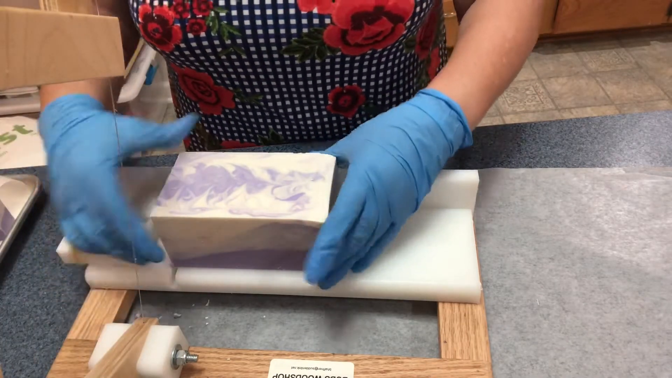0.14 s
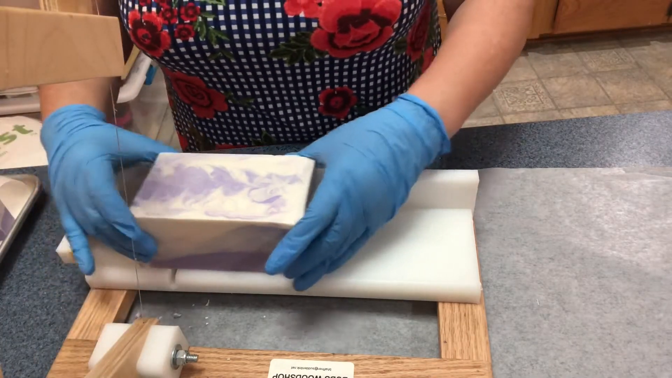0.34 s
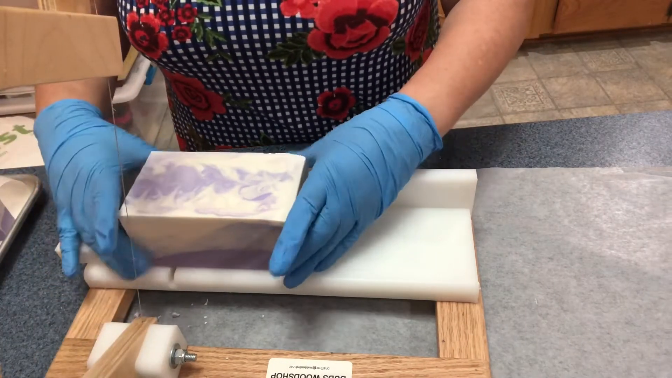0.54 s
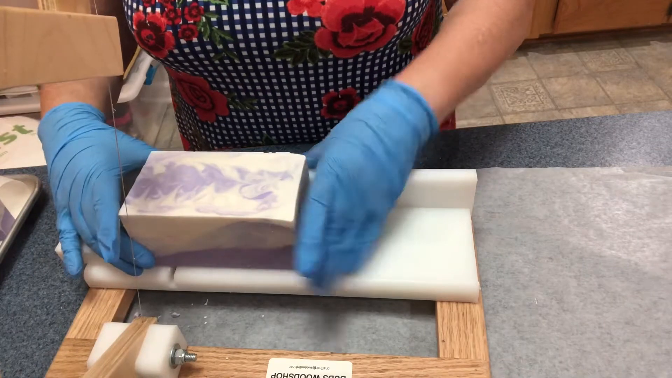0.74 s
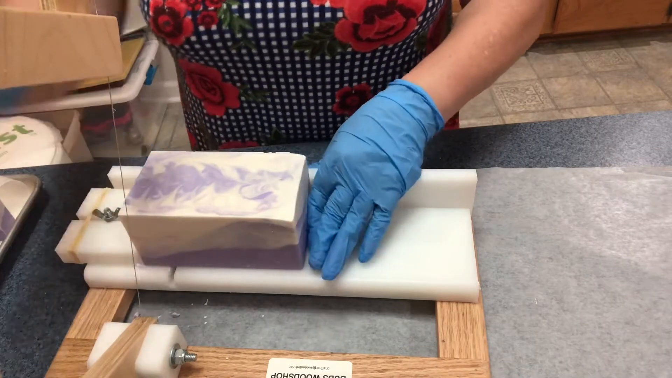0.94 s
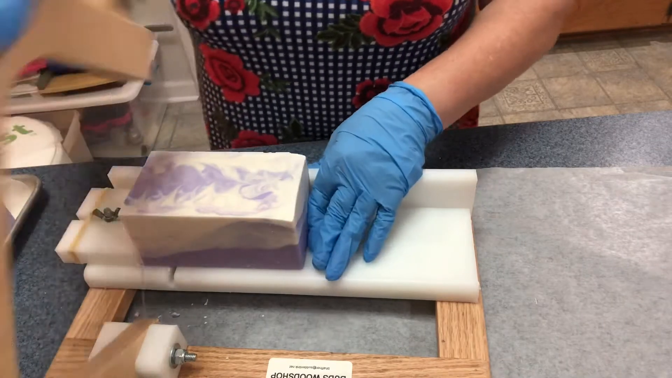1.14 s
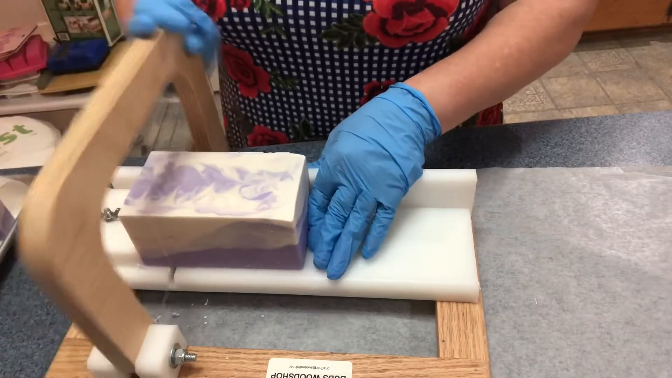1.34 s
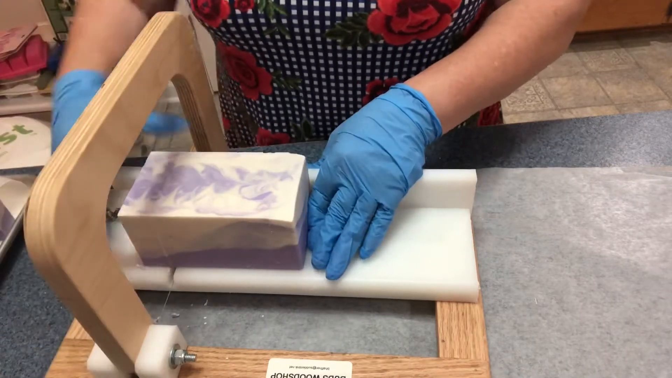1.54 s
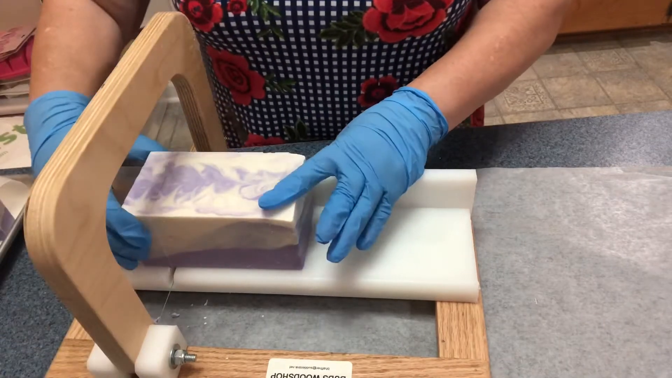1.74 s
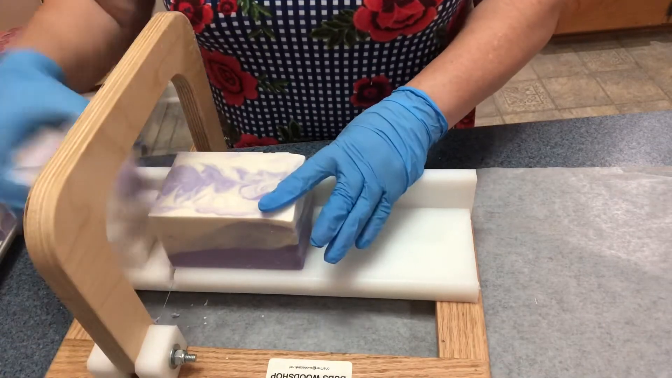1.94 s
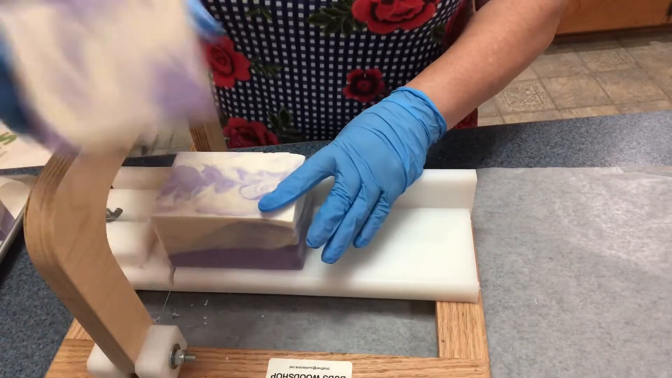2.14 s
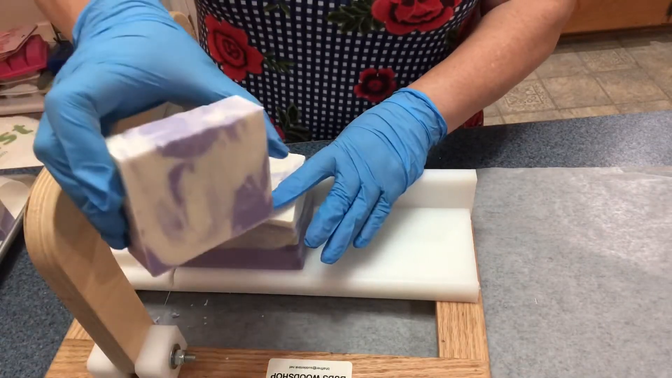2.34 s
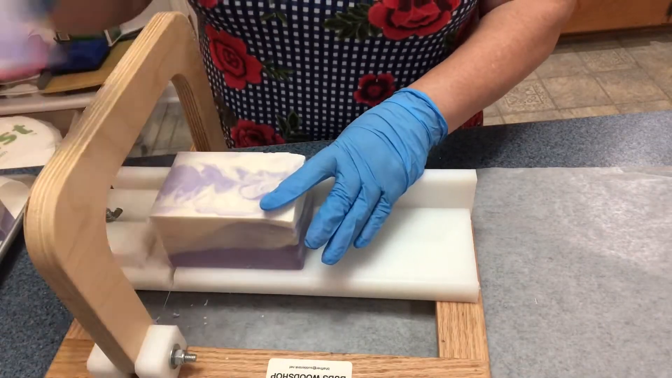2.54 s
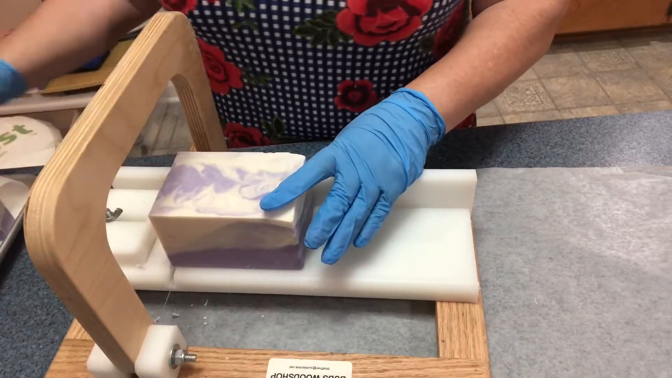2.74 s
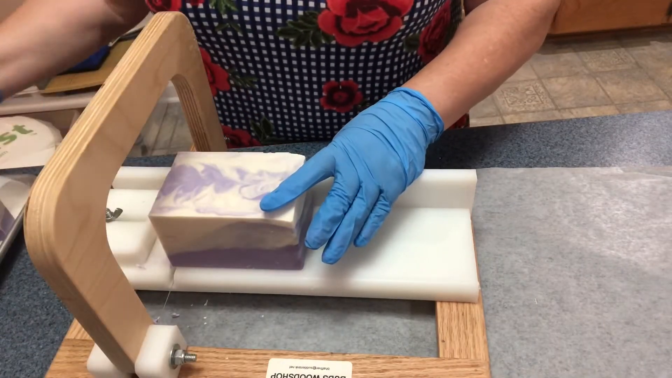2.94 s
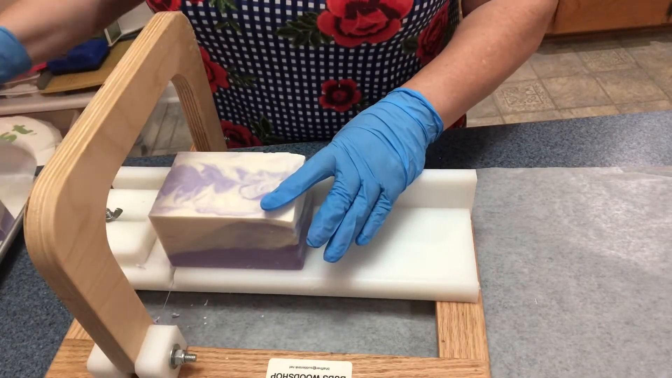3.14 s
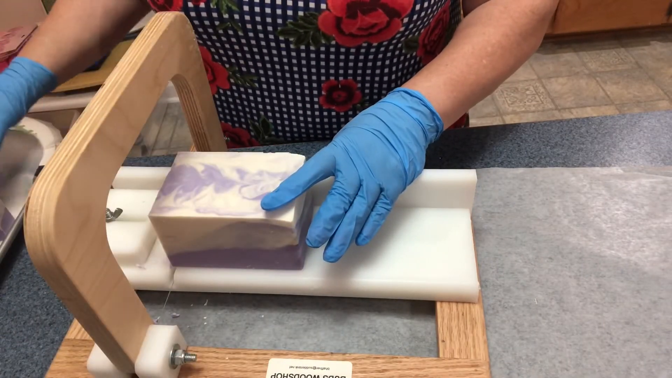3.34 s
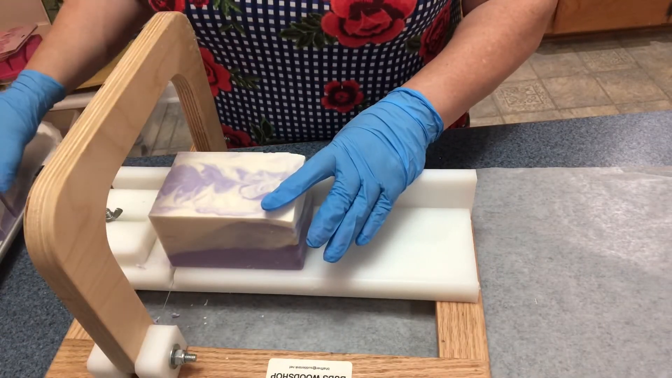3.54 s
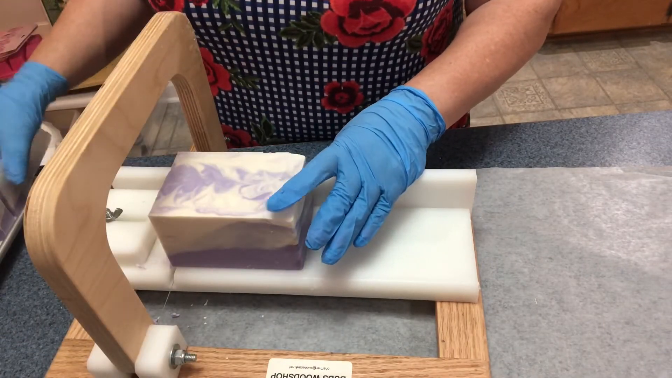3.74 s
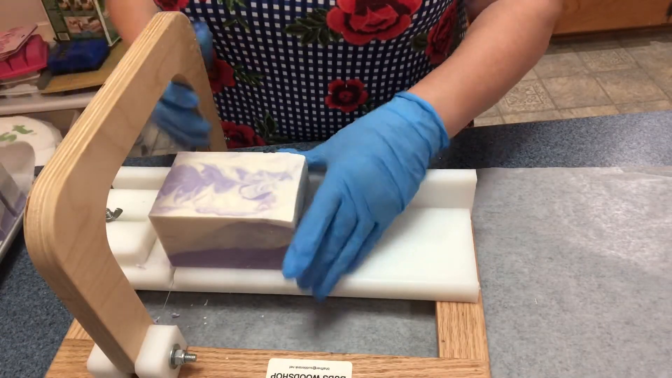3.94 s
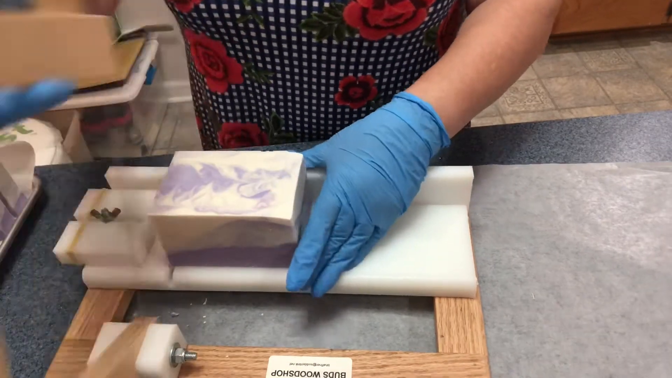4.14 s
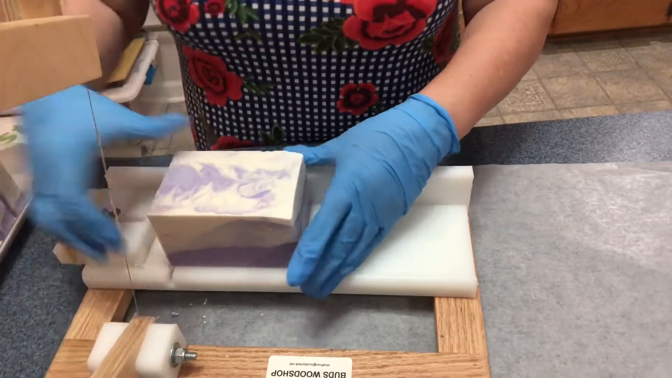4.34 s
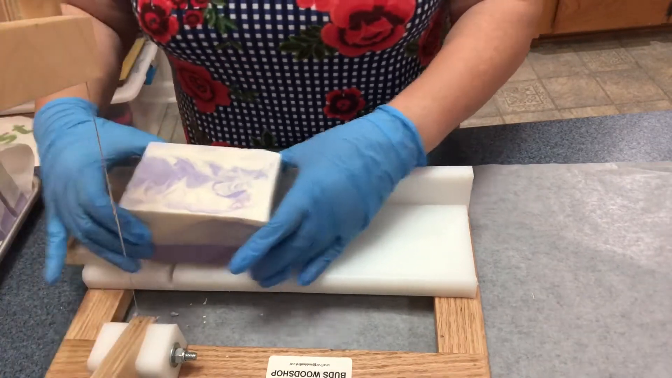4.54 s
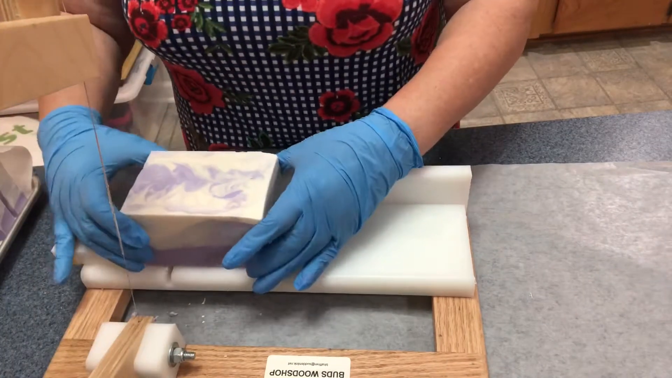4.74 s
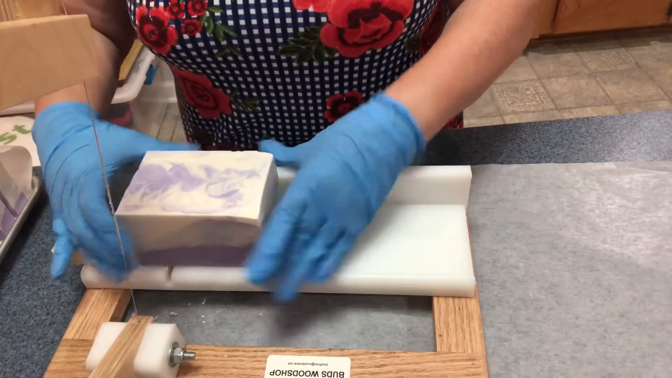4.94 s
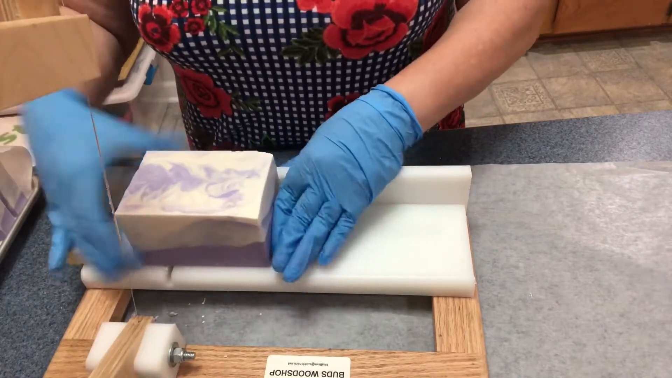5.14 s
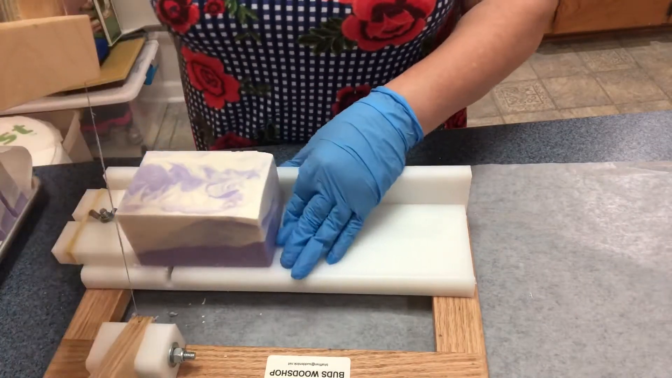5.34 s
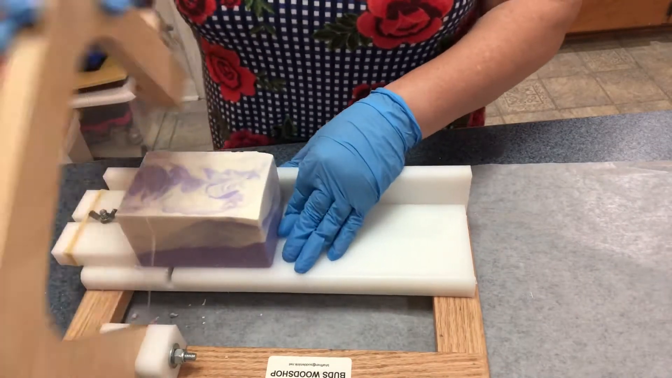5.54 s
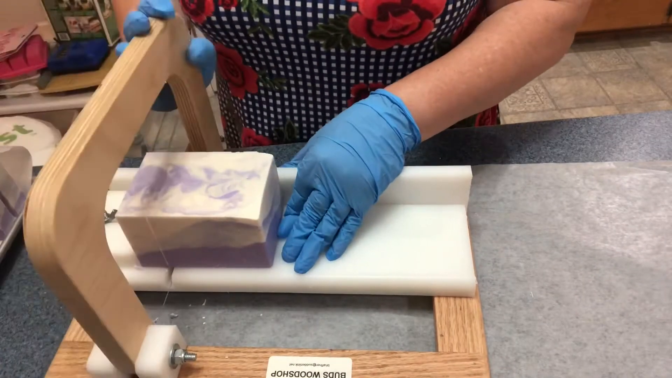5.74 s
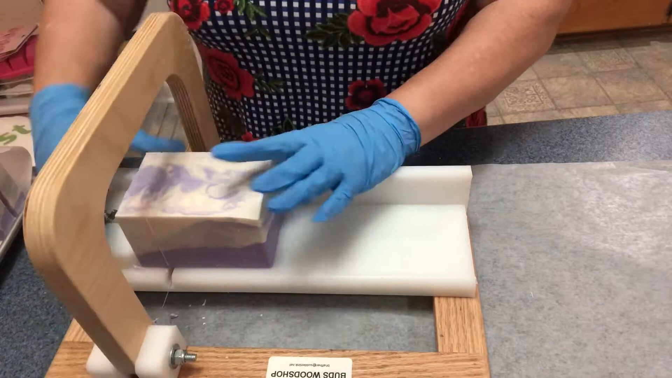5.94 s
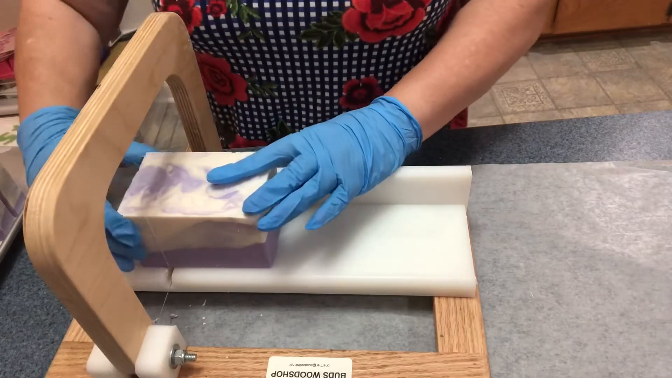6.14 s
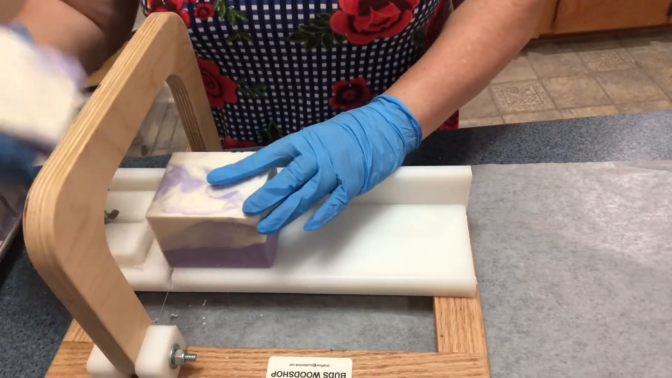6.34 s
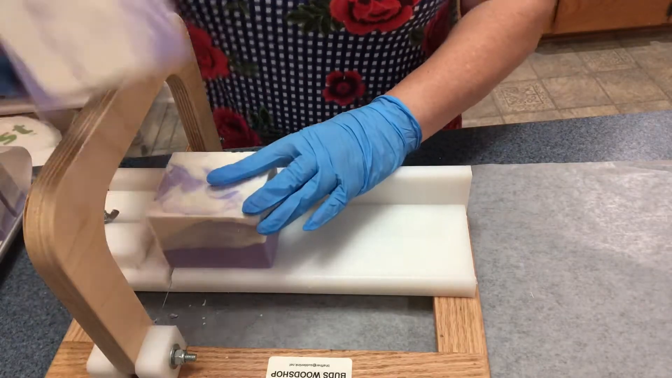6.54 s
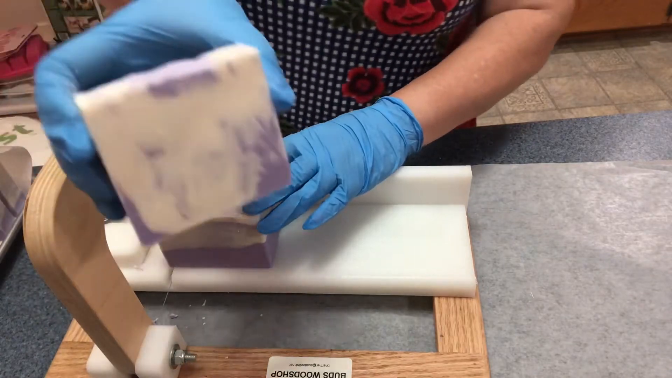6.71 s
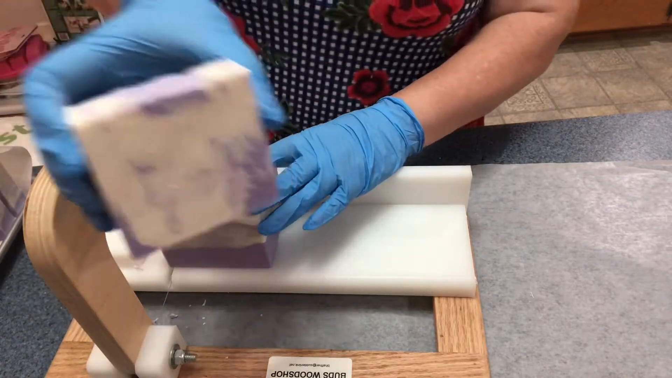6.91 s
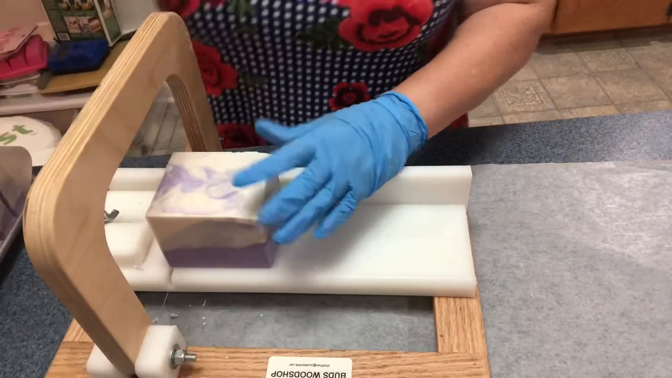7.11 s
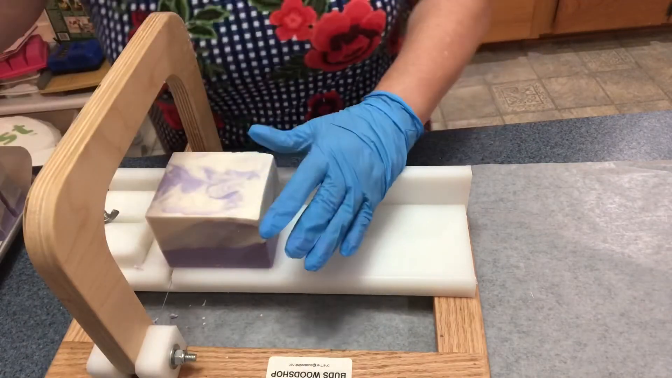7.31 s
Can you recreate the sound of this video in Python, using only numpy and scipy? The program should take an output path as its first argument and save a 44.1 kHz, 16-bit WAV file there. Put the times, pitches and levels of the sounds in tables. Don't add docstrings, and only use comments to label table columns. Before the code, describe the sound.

Close up in a small, slightly live kitchen, an appliance hums quietly with a thin whine. Rubber gloves rub, tick and tap a soap loaf on a plastic tray. A wire cracks hard onto the board, ringing wood and metal fittings. Crisp paper rustles follow, then more glove taps, squeaks and bumps before a second equally sharp crack and a few faint crinkles.

```python
import sys
import numpy as np
from scipy import signal
from scipy.fft import rfft, irfft
from scipy.io import wavfile
from scipy.ndimage import uniform_filter1d

SR = 44100
rng = np.random.default_rng(int(sys.argv[2]) if len(sys.argv) > 2 else 0)


def level_to_linear(level):
    exponent = np.asarray(level, float) / 20
    return 10 ** exponent


def waveform_to_disk(signal):
    frames = np.transpose(np.atleast_2d(signal))
    scaled = np.clip(frames, -1, 1) * 32767
    samples = np.round(scaled).astype(np.int16)
    wavfile.write(sys.argv[1], SR, samples)


N = 325017
T = np.arange(N) / SR


def colour(x, points, phase=0):
    hz = np.maximum(np.fft.rfftfreq(len(x), 1 / SR), 1)
    f, db = np.transpose(points)
    gain = level_to_linear(np.interp(np.log(hz), np.log(f), db))
    return irfft(rfft(x) * gain * np.exp(1j * phase), len(x))


def band(x, lo_hz, hi_hz):
    sos = signal.butter(2, [lo_hz, min(hi_hz, 0.48 * SR)], "bandpass", fs=SR, output="sos")
    return signal.sosfilt(sos, x)


def add(out, s, sound, db):
    i = int(s * SR)
    sound = sound[:N - i]
    out[i:i + len(sound)] += sound * level_to_linear(db) / np.max(np.abs(sound))


def fade(t, t60):
    return np.exp(-np.log(1000) * t / t60)


def ring(modes, phases, size):
    t = T[:size]
    out = 0
    for (hz, db, t60), phase in zip(modes, phases):
        out = out + level_to_linear(db) * np.sin(2 * np.pi * (hz * t + phase)) * fade(t, t60)
    return out


def walk(rate):
    k = int(SR / rate)
    held = np.repeat(rng.standard_normal(N // k + 1), k)
    return 1.9 * uniform_filter1d(uniform_filter1d(held, k), k)[:N]


def tick(hz, ms, noise, skirt=0.9):
    rise = 0.12
    t = T[:len(noise)] * 1000 / ms
    burst = noise * (1 - np.exp(-t / rise)) * np.exp(-t)
    burst[int(rise * ms * SR / 1000) + 2] += 1.8
    return band(burst, hz / 1.1, hz * 1.1) + band(burst, hz / 1.9, hz * 1.7) + skirt * band(burst, 1200, 13000)


def kitchen():
    # (frequency [Hz], level [dB per Hz])
    hush_shape = [(30, -37), (55, -37.5), (108, -10), (200, -8.5), (400, -5), (560, -9.5), (780, -8.5),
                  (1700, -12), (2200, -16), (2700, -17.5), (4000, -23.5), (8000, -27), (16000, -31)]
    # (frequency [Hz], level [dB])
    drone = [(118.4, -85.5), (382, -83), (421, -81), (479, -85.5), (742.9, -82.5), (807.5, -85),
             (940, -84.5), (1184, -87), (1450, -89), (1879, -73), (2148, -85)]
    # (time [s], frequency [Hz], level [dB])
    whine_path = [
        (0, 1880, -82),
        (1.7, 1884, -82),
        (1.95, 1879, -73.5),
        (3.5, 1878, -75),
        (5.0, 1875, -75),
        (6.0, 1877, -76),
        (6.6, 1876, -74.5),
        (7.37, 1866, -73),
    ]
    hush = colour(rng.standard_normal(N), hush_shape)
    out = hush / hush.std() * level_to_linear(-65 + 0.4 * walk(2.95))
    for hz, db in drone:
        if abs(hz - whine_path[0][1]) > 40:
            line = band(rng.standard_normal(N), hz - 4, hz + 4)
            out += line / line.std() * level_to_linear(db + 1.3 * walk(0.8))
    s, hz, db = np.transpose(whine_path)
    whine = np.sin(2 * np.pi * np.cumsum(np.interp(T, s, hz)) / SR)
    return out + np.sqrt(2) * whine * level_to_linear(np.interp(T, s, db) + 1.2 * walk(3.0))


def room(x):
    # (centre [Hz], t60 [s], level [dB])
    tail_bands = [(151.2, 0.27, 1), (533, 0.22, -2), (1484, 0.21, 0), (3919, .21, -5.5), (7000, 0.22, -6),
                  (12700, 0.17, -6)]
    t, tail, onset_s = T[:SR // 2], 0, 0.0043
    middles = [np.sqrt(a[0] * b[0]) for a, b in zip(tail_bands, tail_bands[1:])]
    edges = [60] + middles + [18000]
    for (hz, t60, db), lo, hi in zip(tail_bands, edges, edges[1:]):
        decay = fade(t, t60)
        noise = rng.standard_normal(len(t)) * decay * (1 - np.exp(-(t / onset_s) ** 2))
        tail = tail + level_to_linear(db) * band(noise, lo / 0.97, hi * 1.09) / np.sqrt(np.sum(decay ** 2))
    return signal.fftconvolve(x, tail)[:N]


def strokes(rows):
    release_s = 0.011
    out = np.zeros((2, N))
    for start, end, db, swell_db in rows:
        i, j = int(start * SR), int(end * SR)
        treble_db = -np.log2((end - start) / 0.029)
        swell = swell_db * np.linspace(-0.5, 0.5, j - i)
        out[:, i:j] += level_to_linear(db + swell + np.array([[0], [treble_db]]))
    keep = np.exp(-1 / (release_s * SR))
    return signal.lfilter([1 - keep], [1, -keep], uniform_filter1d(out, size=300, axis=1))


def crackle(per_s, size_db, ms):
    pops = (rng.random(N) < per_s / SR) * level_to_linear(size_db * rng.exponential(size=N))
    puffs = signal.lfilter([1], [1, -np.exp(-1000 / (ms * SR))], pops) * rng.standard_normal(N)
    puffs = band(puffs, 3600, 11000)
    return puffs / puffs.std()


def rubbing():
    # (start [s], end [s], level [dB], swell [dB])
    rubs = [(0.071, 0.096, -67, -3), (0.164, 0.185, -71, -1), (0.22, 0.236, -70, 22),
            (0.427, 0.478, -71, -22), (0.653, 0.7, -68, -6), (0.725, 0.79, -64.5, -1),
            (1.001, 1.022, -62, -4), (1.031, 1.304, -70, -3), (1.55, 1.58, -65, -32.5),
            (1.584, 1.677, -72.5, -2), (1.841, 1.88, -71, -26), (3.988, 4.139, -63, -8),
            (4.171, 4.203, -59, -14), (4.363, 4.401, -64, -7), (4.518, 4.55, -66, -20),
            (4.598, 4.66, -70, -21), (4.698, 4.716, -67, -23), (4.872, 4.892, -56, 6.5),
            (4.893, 4.91, -66, -11), (4.948, 4.978, -63, -14), (5.091, 5.102, -51.5, 11),
            (5.104, 5.13, -71, -14), (5.269, 5.322, -63, 0), (5.36, 5.599, -71, -1),
            (5.869, 5.944, -74.5, -8.5), (6.119, 6.154, -70.5, 6), (6.384, 6.461, -73, -3),
            (7.003, 7.078, -82, -7)]
    # (start [s], end [s], level [dB], swell [dB])
    rustles = [(2.6, 2.7, -81.5, 3), (2.705, 2.74, -66.5, 2), (2.744, 2.842, -75, 10),
               (2.861, 2.887, -73, -23.5), (2.93, 2.955, -60.5, -2), (2.956, 2.993, -51, 5),
               (2.997, 3.026, -50, -13), (3.032, 3.046, -52, 0), (3.046, 3.056, -43, -8),
               (3.058, 3.08, -56.5, -16), (3.08, 3.145, -63.5, -13), (3.147, 3.225, -68.5, -4),
               (3.27, 3.318, -70, -4), (3.322, 3.385, -69, 4), (3.39, 3.445, -60.5, -15),
               (3.448, 3.496, -67.5, -6), (3.502, 3.514, -49, -10), (3.516, 3.534, -53.5, 11),
               (3.536, 3.558, -59.5, -15), (3.56, 3.63, -76, -8), (3.63, 3.716, -68.5, 4),
               (3.72, 3.77, -64.5, -18), (3.775, 3.865, -69.5, 8), (3.899, 3.948, -67, -13),
               (3.95, 3.993, -71, 13)]
    slip_times = rng.random(N) < 5000 / SR
    grains = slip_times * level_to_linear(rng.exponential(size=N)) * rng.standard_normal(N)
    slips = grains / grains.std() + 1.3 * rng.standard_normal(N)
    bands = [band(slips, 440, 1000), band(slips, 2000, 9500), band(slips, 7500, 14500)]
    under, low, high = [v / v.std() for v in bands]
    crisp = band(slips, 3200, 13300)
    pops = crackle(140, 2.8, 0.8)
    rubber = low + level_to_linear(-14) * under
    paper = crisp / crisp.std() + level_to_linear(-5) * low + level_to_linear(-9) * under
    press, treble = strokes(rubs)
    out = press * rubber + treble * (level_to_linear(-5.5) * high + level_to_linear(-17) * pops)
    press, treble = strokes(rustles)
    out += press * paper + treble * (level_to_linear(-20) * high + level_to_linear(-12) * pops)
    return out * level_to_linear(1.72 * walk(60))


def squeaks():
    # (start [s], length [s], frequency [Hz], peak [dB])
    slides = [(.462, 0.017, 2580, -56), (.678, .016, 2660, -55), (1.561, 0.005, 5300, -48),
              (4.012, 0.019, 1950, -55), (4.03, 0.023, 5340, -60), (4.045, .01, 3800, -66),
              (4.094, 0.035, 5900, -59), (4.105, 0.023, 1740, -53), (4.108, 0.011, 780, -51.5),
              (4.959, 0.012, 2740, -59), (4.586, .01, 1000, -53), (4.196, 0.011, 5330, -56),
              (5.855, .01, 10340, -60), (5.888, 0.02, 13500, -60.5), (6.13, 0.026, 5300, -66)]
    out, width = np.zeros(N), 0.098
    for s, length, hz, db in slides:
        shape = np.sin(np.pi * np.clip(T[:4096] / length, 0, 1))
        hiss = band(rng.standard_normal(4096), hz * (1 - width), hz * (1 + width))
        add(out, s, hiss * shape, db)
    return out


def crunches():
    # (start [s], length [ms], peak [dB], centre [Hz])
    runs = [(.2315, 8.8, -54, 1950), (.2315, 7, -56, 5900), (0.3467, 2.5, -31, 8600),
            (.349, 4.4, -43, 1500), (.428, 9.2, -46.5, 8000), (0.431, 6, -54, 3200), (.44, 15, -46, 9500),
            (.467, 7, -50, 6000), (0.5623, 5.1, -48, 3300), (2.9555, 3, -38, 11000), (2.963, 4, -33, 7000),
            (3.0458, 9.6, -25.5, 7200), (3.049, 7.3, -43, 2200), (3.05, 9, -45, 700),
            (3.0605, 7, -33, 9000), (3.063, 6, -41, 2300), (3.406, 3, -41, 6000), (3.5058, 4, -29, 9000),
            (3.536, 5, -29.5, 5950), (3.548, 3.5, -38, 8000), (3.899, 7, -46, 6000), (3.911, 7, -50, 6500),
            (3.932, 9, -40, 7460), (4.172, 3.3, -49, 8000), (4.1765, 3, -38, 9700), (4.192, 9, -46, 9500),
            (4.5157, 4, -38, 6000), (4.517, 4.9, -48, 1800), (5.1006, 3.1, -32.5, 1430),
            (5.092, 11, -38.5, 9500), (5.095, 6, -42, 2600), (5.103, 5, -40, 9000), (1.5575, 6, -49, 6500),
            (1.559, 5, -54, 12000), (1.556, 10, -47, 2800), (1.5655, 3, -51, 7700), (2.9735, 3, -38, 8500),
            (3.093, 5, -39, 9500), (3.4565, 3.5, -35.5, 5000), (3.4572, 3, -31, 11500),
            (4.603, 5.4, -42, 7000), (4.699, 4.7, -45, 7000), (5.2983, 4, -39, 8500)]
    out, t, width = np.zeros(N), T[:1024], 1.54
    for s, ms, db, hz in runs:
        when, size, noise = rng.random((3, 1024))
        sizes = (when < 4000 / SR) * level_to_linear(-2.5 * np.log(size + 1e-9))
        slips = (0.27 + sizes) * (noise - 0.5)
        shape = np.sin(np.pi * np.clip(t * 1000 / ms, 0, 1) ** 0.59)
        add(out, s, band(slips * shape, hz / width, hz * width), db)
    return out


def creases_and_folds():
    # (time [s], peak [dB], centre [Hz])
    creases = [(0.0813, -50, 11740), (0.2232, -53, 11600), (0.3468, -31.5, 5400), (0.4349, -39.5, 8800),
               (.4493, -54, 8950), (.4538, -51, 7660), (0.6617, -49.5, 8400), (.6815, -49, 8000),
               (0.7113, -52, 5400), (.7446, -53, 5700), (0.7687, -42, 9560), (1.0142, -42, 8900),
               (1.0407, -42, 5270), (1.0575, -55, 11000), (1.1658, -49, 13000), (1.1801, -43, 12000),
               (1.188, -51.5, 10000), (1.2483, -46.5, 9470), (1.275, -43.5, 6950), (1.2815, -53, 9100),
               (1.5254, -52, 7100), (1.5627, -33, 5100), (1.6065, -50, 2820), (1.6127, -58, 3790),
               (1.6185, -56, 7750), (1.8576, -47, 7000), (3.99, -47, 2580), (4.1758, -27.5, 9800),
               (4.1801, -46, 3620), (4.185, -53, 6100), (4.1951, -46, 4600), (4.1998, -36, 9030),
               (4.4816, -47.5, 5340), (4.5792, -46.5, 5340), (4.5892, -43, 5430), (4.6081, -46, 8440),
               (4.8884, -43, 9390), (4.9338, -48, 6970), (4.9514, -52, 5340), (4.9672, -47, 2670),
               (4.9968, -54, 4500), (5.1047, -41, 3100), (5.2776, -51, 8180), (5.2847, -46, 5200),
               (5.3134, -51, 5580), (5.505, -42.5, 8950), (5.5386, -51, 10250), (5.5435, -40.5, 9470),
               (5.5561, -58, 3530), (5.7749, -31, 12600), (5.858, -57.5, 10340), (5.876, -44.5, 6000),
               (5.9432, -58, 8070), (6.3926, -53, 8980), (6.3969, -40.5, 9400), (6.4106, -57.5, 12400),
               (6.4375, -56, 7430), (6.4464, -38, 9160), (6.4468, -45, 3690), (7.0241, -56, 6010)]
    # (time [s], peak [dB], centre [Hz])
    folds = [(2.708, -51, 3620), (2.724, -44.5, 3530), (2.7612, -39.5, 9170), (2.794, -42.5, 10200),
             (2.8125, -43, 3700), (2.8202, -40, 3500), (2.8748, -48, 8360), (2.9529, -40, 3380),
             (2.9589, -34, 3650), (2.9632, -29, 6000), (2.9725, -34, 7500), (2.9746, -35, 3620),
             (2.9805, -39, 6000), (2.989, -36, 9000), (3.0092, -31, 6200), (3.0154, -30, 8180),
             (3.0205, -37, 6630), (3.0335, -28, 10500), (3.0385, -40, 6720), (3.0488, -22.5, 7500),
             (3.0615, -33, 8000), (3.0636, -26, 12000), (3.0945, -44, 10300), (3.1033, -47, 8950),
             (3.1529, -41, 8180), (3.379, -52, 9200), (3.391, -38, 5500), (3.3964, -32, 7000),
             (3.4065, -30, 12700), (3.4436, -49, 8600), (3.4564, -30.5, 10400), (3.4868, -49, 5680),
             (3.497, -44, 6290), (3.5021, -26.5, 8500), (3.5059, -26, 8440), (3.5175, -34, 11000),
             (3.5262, -37, 10800), (3.5312, -33, 5500), (3.5359, -29, 10000), (3.5445, -35, 6980),
             (3.5488, -39, 8790), (3.5567, -39, 6030), (3.6034, -43, 9800), (3.6522, -49, 5600),
             (3.678, -45, 9470), (3.685, -36, 10100), (3.703, -42, 8100), (3.719, -36, 7100),
             (3.7333, -37, 8950), (3.738, -43, 9130), (3.7486, -36.5, 2150), (3.7568, -39, 2500),
             (3.763, -38.5, 5740), (3.8086, -45, 8400), (3.8224, -42, 6200), (3.8378, -40, 9390),
             (3.851, -42, 8530), (3.902, -48, 3010), (3.9175, -41, 8400), (3.9388, -39, 7800)]
    out = np.zeros(N)
    for s, db, hz in list(creases) + list(folds):
        ms = 0.99 * np.exp(0.37 * rng.standard_normal())
        add(out, s, tick(hz, ms, rng.standard_normal(600), skirt=0.93), db - 1)
    return out


def taps():
    # (time [s], ring level [dB], pitch [Hz], click level [dB], click centre [Hz])
    tray_taps = [(0.3477, -42.5, 2540, -38, 5500), (0.469, -51, 2700, -52, 5500),
                 (0.5615, -50, 1960, -41.5, 5400), (0.6886, -53, 2610, -40.5, 7540),
                 (0.783, -38, 2900, -40, 6100), (1.198, -53, 2100, -42, 4600),
                 (1.555, -52, 2920, -36.5, 4600), (3.9327, -43, 1880, -35, 5500),
                 (3.9379, -42.5, 1900, -38, 4300), (4.5162, -48, 1560, -31.5, 6300),
                 (4.6024, -47, 2180, -36, 6360), (4.699, -61, 1910, -41, 6400),
                 (4.893, -43, 2600, -37.5, 7300), (5.1013, -35.5, 1920, -26.5, 3790),
                 (5.299, -43, 1800, -36.5, 4530), (7.071, -50.5, 1860, -50.5, 2694)]
    out, t60 = np.zeros(N), 0.0069
    for s, db, hz, click_db, click_hz in tray_taps:
        modes = [(hz, 0, t60), (hz * 1.1, -4, t60 * 0.9),
                 (hz * 1.2, -4, t60 * 0.31), (hz * 0.45, -6, t60 * 0.96)]
        tray = ring(modes, rng.random(4), 2048) * (1 - np.exp(-T[:2048] / 0.0011))
        add(out, s, tray, db)
        add(out, s, tick(click_hz, 1, rng.standard_normal(600)), click_db)
    return out


def bumps():
    # (time [s], peak [dB], hardness [dB per octave], ring length [times])
    blows = [(.349, -47.5, 0.5, 2), (0.561, -45.5, 6.5, 0.44), (0.573, -49, -8, 0.49),
             (0.784, -54, 11, 0.54), (1.048, -56, 9.5, 1.3), (1.184, -53, -8, 0.92), (1.794, -53.5, 1, 1.1),
             (1.837, -58.5, 1, 0.85), (3.904, -42.5, 6.5, 0.27), (3.915, -45.5, 4.5, 1.26),
             (3.937, -46, -5, 0.78), (4, -58, 2, 0.85), (4.105, -60, 15, 0.74), (4.155, -44.5, 0.5, 1.3),
             (4.516, -34.5, 4, 1.2), (4.603, -46, -2.5, 2.3), (4.652, -50, -29, 0.99),
             (4.675, -57, -25, 0.65), (5.104, -55, -12, 1.3), (5.322, -54, -6, 0.98),
             (5.545, -52, -14.5, 0.78), (6.125, -51, 6, 1.46), (7.067, -54, 1.5, 0.3)]
    # (frequency [Hz], level [dB], t60 [s])
    board = [(135, -3.5, 0.1), (187, -5.5, 0.11), (283, 1.5, 0.082), (390, -1, 0.065), (508.2, -2, 0.045),
             (721, -18.5, 0.0382), (1112, -19.5, 0.029)]
    out, t = np.zeros(N), T[:8192]
    for s, db, tilt_db, hold in blows:
        thud = 0
        for hz, mode_db, t60 in board:
            phase, shift, grip = rng.random(3)
            level_db = mode_db + tilt_db * np.log2(hz / 282) + 6 * (grip - 0.5)
            mode = (hz * (1 + 0.12 * (shift - 0.5)), level_db, t60 * hold)
            rise = 1 - np.exp(-(t * hz / 0.7) ** 2)
            thud = thud + ring([mode], [0.18 * phase], len(t)) * rise
        add(out, s, thud, db)
    return band(band(out, 100, 5000), 100, 5000)


def frame_ring(shorter, spread, size):
    # (frequency [Hz], level [dB], t60 [s], change once the loaf is shorter [dB])
    wood = [(143, -4, 0.045, -0.6), (180, -8, 0.076, 4), (280, -2.5, 0.11, -4.5), (363, -9, 0.055, 2),
            (381, -8, 0.22, 0.1), (413, -4.5, 0.092, 1), (482, -8, .14, -2.5), (536, -1, 0.078, -1.5),
            (662, -12, 0.13, -3), (752, -9, 0.12, 1.5), (955, -7.5, 0.049, -0.5), (1029, -11, 0.1, 2.5),
            (1092, -9.5, 0.09, -0.45), (1295, -8, 0.06, 0), (1443, -11.5, .07, -0.6),
            (1662, -16, 0.095, -3.5), (2180, -10.5, 0.062, -1.2), (2040, -9.5, 0.08, 0.2)]
    modes = [(hz, db + shorter * change_db, t60) for hz, db, t60, change_db in wood]
    return ring(modes, spread * rng.random(len(modes)), size)


def touches():
    # (time [s], peak [dB], centre [Hz], length [ms], frame level [dB])
    contacts = [
        (1.298, -28.5, 6060, 2.1, -32),
        (5.6648, -28.5, 5410, 2.1, -35.5),
    ]
    out = np.zeros(N)
    for s, db, hz, ms, body_db in contacts:
        add(out, s, tick(hz, ms, rng.standard_normal(600)), db)
        stirred = frame_ring(0, 1, 4096) * (1 - np.exp(-T[:4096] / 0.0025))
        add(out, s + 0.0012, stirred, body_db)
    return out


def bending_wave(blow, points):
    hz = np.maximum(np.fft.rfftfreq(len(blow), 1 / SR), 100)
    late = -2 * np.pi * 3.2 * (np.log(hz / 100) - hz / 40000)
    return colour(blow, points, late)[:400]


def chatter():
    # (delay [ms], level [dB])
    rebounds = [
        (0, 2),
        (.3, -8),
        (.75, -15.5),
        (1.3, -11.5),
        (2.0, -20.5),
    ]
    blow = np.zeros(8192)
    for k, (ms, db) in enumerate(rebounds):
        blow[int(ms * (1 + 0.1 * rng.random()) * SR / 1000)] += (-1) ** k * level_to_linear(db)
    return blow


def rattle(t):
    # (frequency [Hz], level [dB], t60 [s])
    fittings = [(1276, -5.5, .15), (1930, -1.5, .15), (2150, -3.5, .09), (3250, -9.5, 0.087), (4266, 3, .1),
                (5200, -6, .1), (6140, 2, .15), (6540, -4.5, .14), (7200, -6, .14), (7500, -5, .12),
                (8630, -9.5, .15)]
    out = 0
    for hz, db, t60 in fittings:
        noise = band(rng.standard_normal(len(t)), hz * 0.97, hz * 1.03)
        out = out + level_to_linear(db) * noise * fade(t, t60) / np.sqrt(hz)
    return out


def wire_hum(t):
    wire_hz, beat_hz, t60 = 396, 19.5, 0.6
    planes = [(wire_hz - beat_hz / 2, 0, t60), (wire_hz + beat_hz / 2, 0, t60)]
    return ring(planes, [0, 0], len(t)) * level_to_linear(3.0 * walk(40)[:len(t)])


def snaps():
    # (time [s], peak [dB], wire hum [dB], frame [dB])
    hits = [
        (1.3094, -6, -39, -0.5),
        (5.6789, -6, -50.5, -1.5),
    ]
    # (frequency [Hz], level [dB per Hz])
    crack_shape = [(250, -40), (480, -6), (1450, -11), (2050, -5.5), (3110, -5.5), (4170, 0.5),
                   (5120, -9.5), (6190, 8), (7600, -1.5), (8670, -18), (9460, -21), (10200, -10),
                   (12500, -2.5), (15600, -19.5), (16500, -18.5)]
    # (frequency [Hz], level [dB per Hz])
    spill_shape = [(710, -37), (1200, -10), (1940, -8.5), (2500, -8.5), (5700, -7), (7330, -6.5),
                   (14500, -14.5), (16000, -23), (16500, -52.5)]
    # (frequency [Hz], level [dB], rise [s], hold [s])
    hollows = [
        (353, -12.5, .0025, .019),
        (948.7, -23.5, .008, 0.022),
    ]
    # (delay [ms], level [dB], centre [Hz])
    knocks = [
        (1.5, -9.5, 2100),
        (2.8, -13.5, 2800),
        (8.46, -19, 7000),
        (11.5, -19, 6500),
        (37.2, -22, 500),
    ]
    crack, body, spill = np.zeros(N), np.zeros(N), np.zeros(N)
    t = T[:16384]
    swell = 1 - np.exp(-t / 0.0056)
    single_blow = np.eye(1, 8192)[0]
    for shorter, (s, db, wire_db, wood_db) in enumerate(hits):
        add(crack, s, bending_wave(chatter(), crack_shape), db + 5.5)
        add(spill, s, bending_wave(single_blow, spill_shape), db + 3)
        add(body, s + 0.0015, frame_ring(shorter, 0.12, len(t)) * swell, db - 10 + wood_db)
        add(crack, s + 0.0021, rattle(t) * swell, db - 19.5)
        for hz, boom_db, rise_s, hold_s in hollows:
            boom = np.sin(2 * np.pi * hz * t) * (1 - np.exp(-t / rise_s)) / (1 + (t / hold_s) ** 6)
            add(crack, s + 0.0016, boom, db + boom_db)
        for ms, knock_db, hz in knocks:
            knock = tick(hz, 0.9, rng.standard_normal(600), skirt=0.05)
            add(crack, s + ms / 1000, knock, db + knock_db)
        thud = band(rng.standard_normal(len(t)), 130, 900) * swell * fade(t, 0.15)
        add(body, s + 0.0015, thud, db - 16.5 + wood_db)
        add(crack, s, wire_hum(t), wire_db)
    return crack + body, spill + level_to_linear(-8) * body


def scene():
    snap, spill = snaps()
    hands = rubbing() + squeaks() + crunches() + creases_and_folds() + taps() + bumps() + touches()
    quiet = kitchen() + room(spill + level_to_linear(-10) * hands) + hands
    top = signal.ellip(8, 0.2, 60, 15900, fs=SR, output="sos")
    return (snap + signal.sosfilt(top, quiet))[None]


def low_pass(x):
    return signal.sosfilt(signal.butter(12, 17160, fs=SR, output="sos"), x)


def record(dry):
    rounded = np.tanh(1.194 * dry) / 1.068
    top = signal.ellip(8, 0.2, 70, 16900, fs=SR, output="sos")
    return low_pass(signal.sosfilt(top, rounded))


dry = scene()
out = record(dry)
waveform_to_disk(out)
```